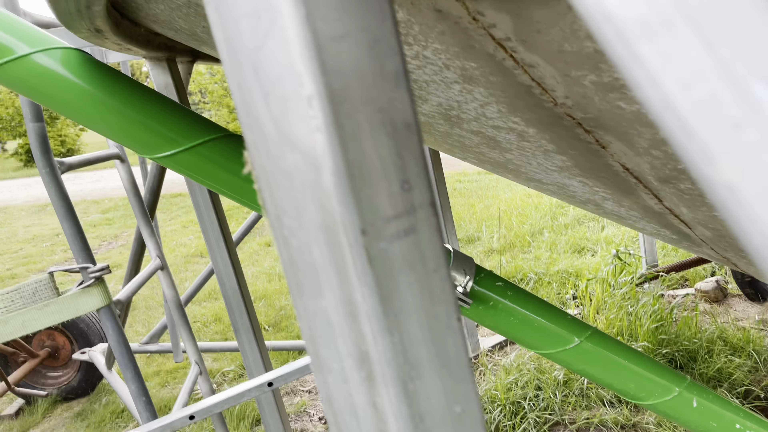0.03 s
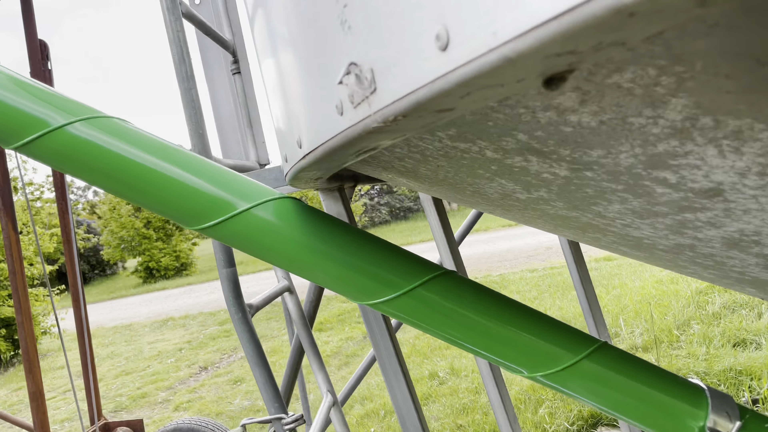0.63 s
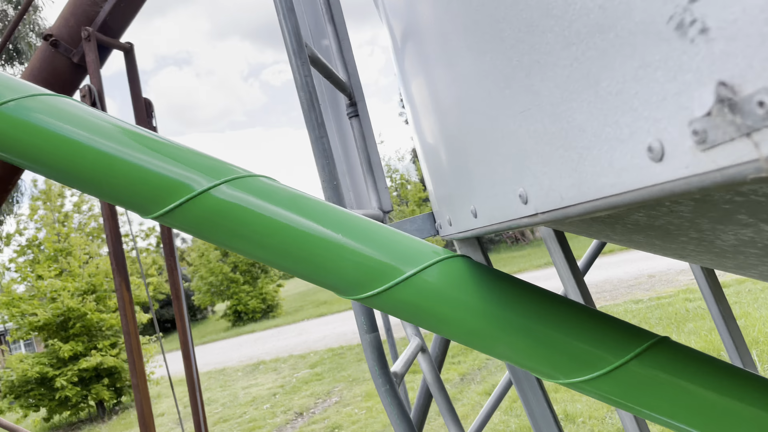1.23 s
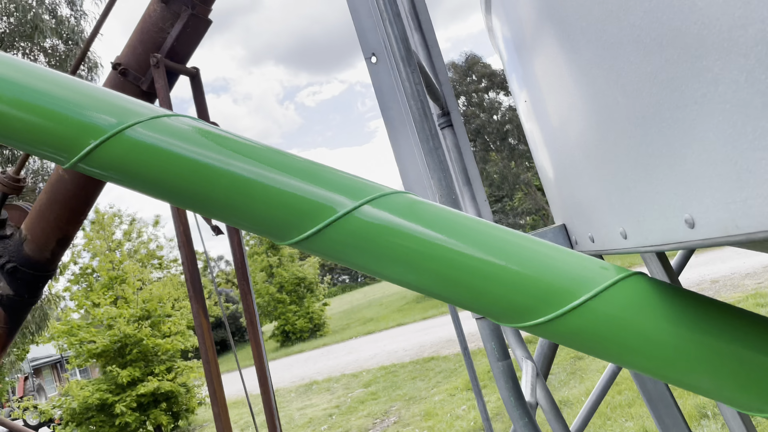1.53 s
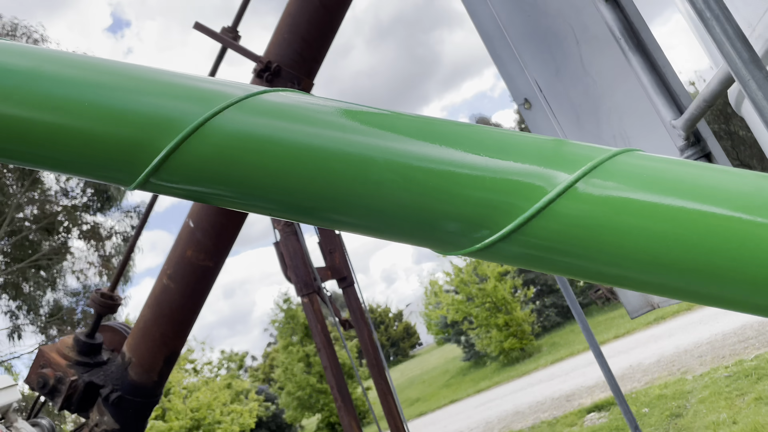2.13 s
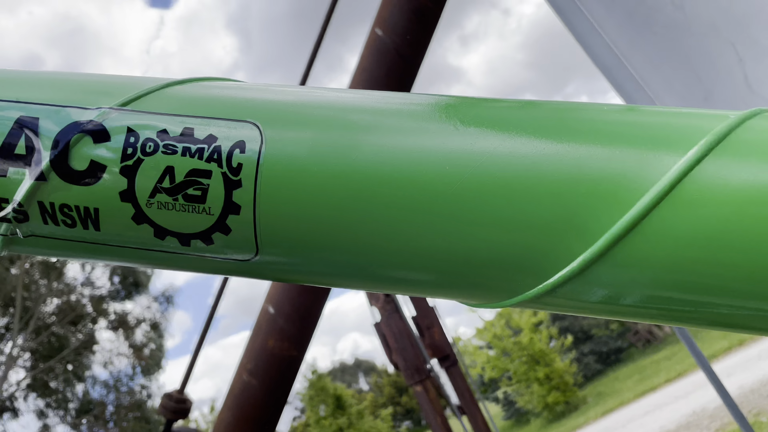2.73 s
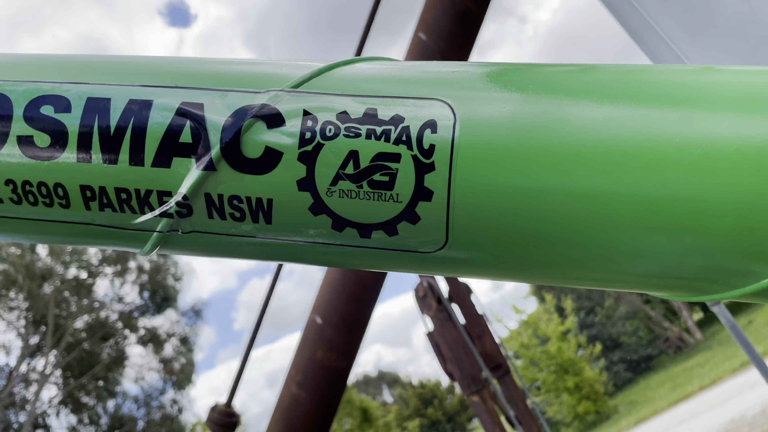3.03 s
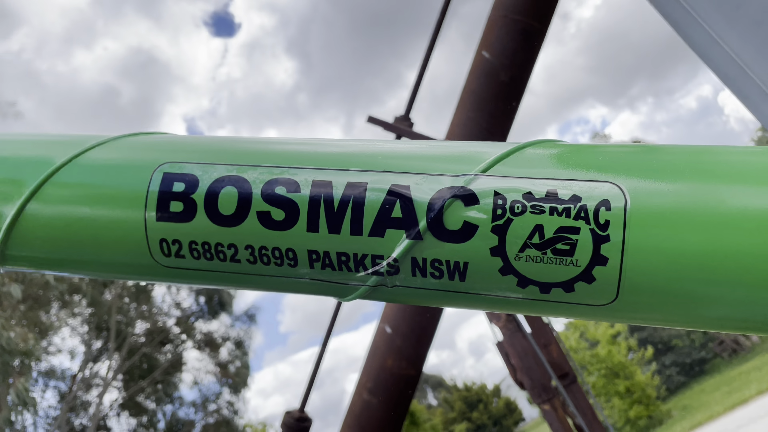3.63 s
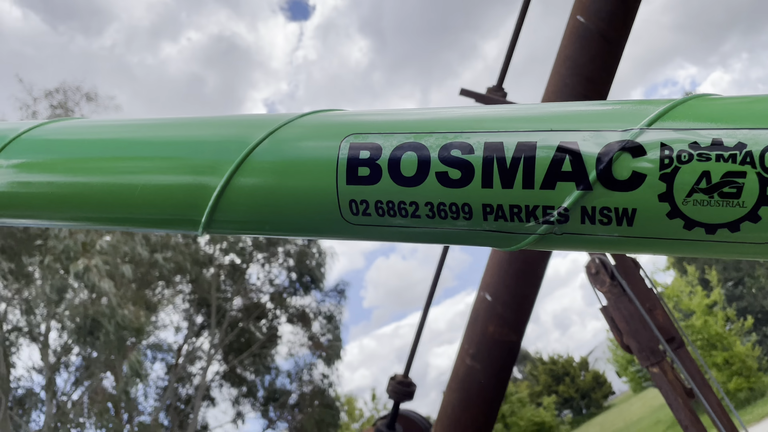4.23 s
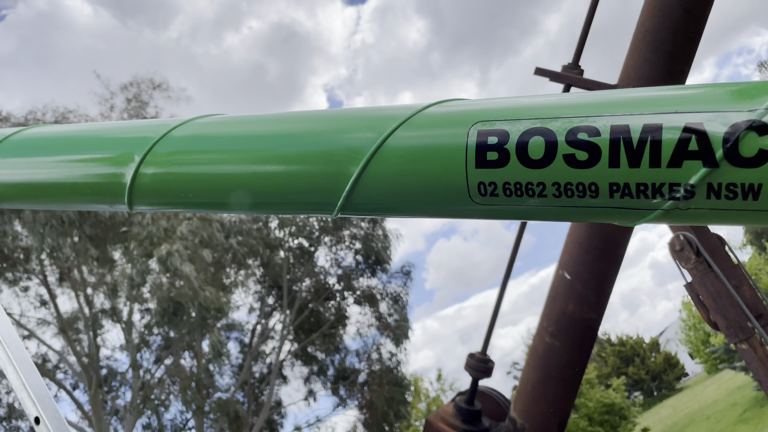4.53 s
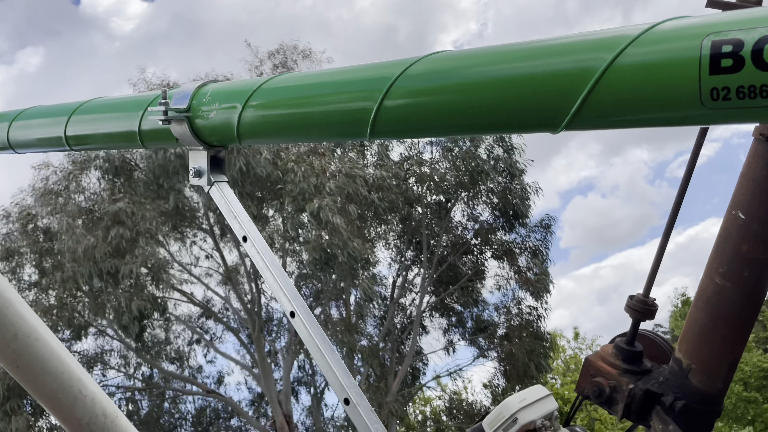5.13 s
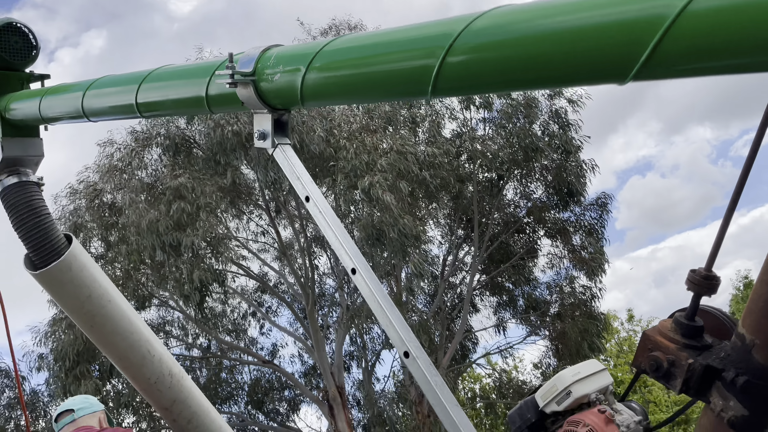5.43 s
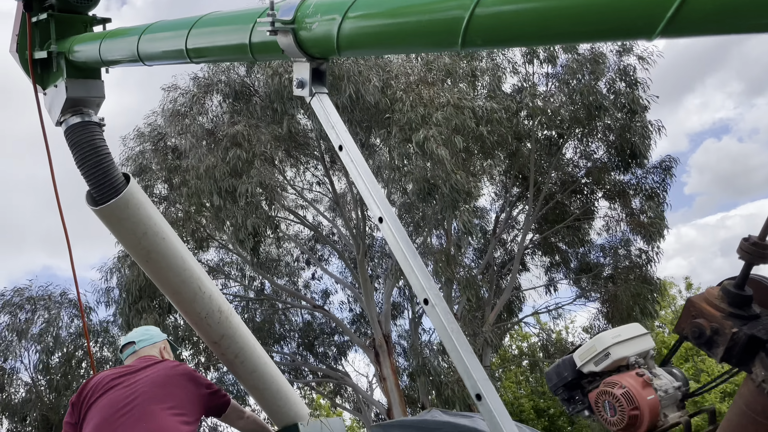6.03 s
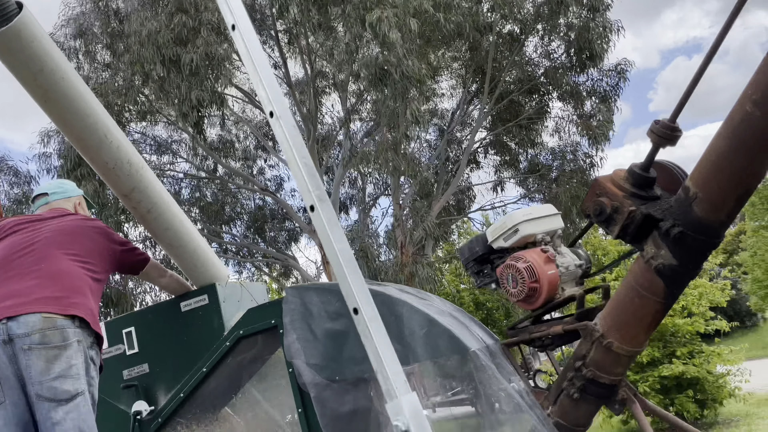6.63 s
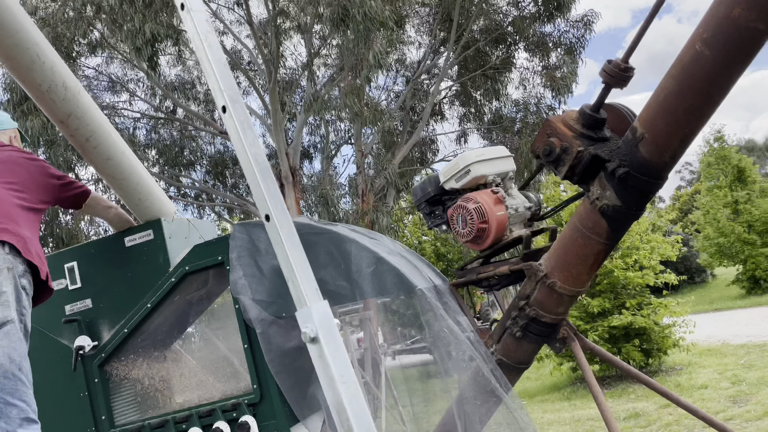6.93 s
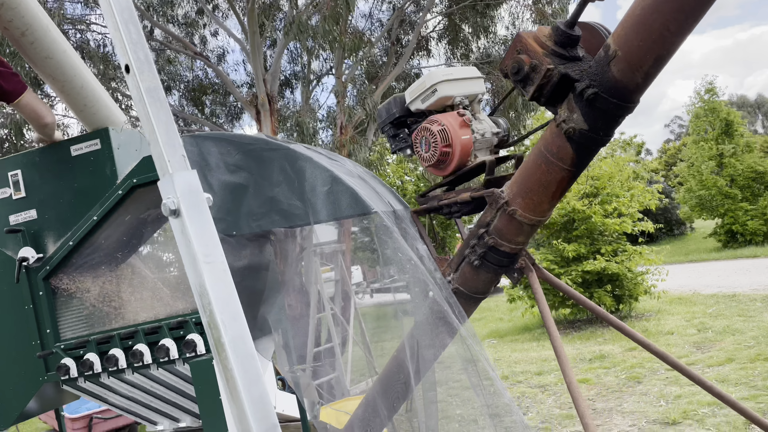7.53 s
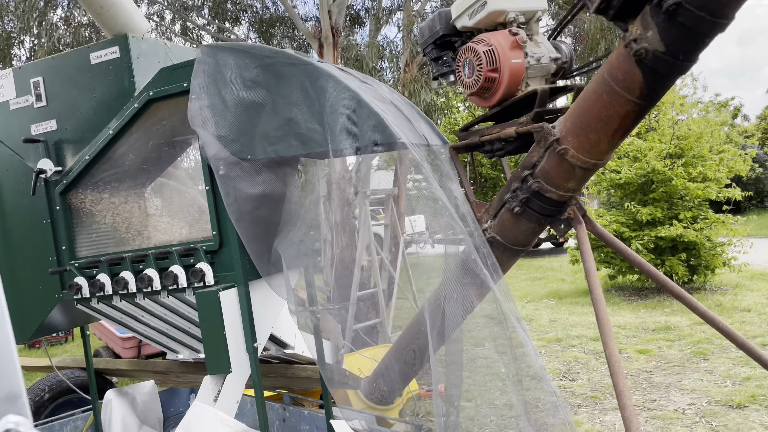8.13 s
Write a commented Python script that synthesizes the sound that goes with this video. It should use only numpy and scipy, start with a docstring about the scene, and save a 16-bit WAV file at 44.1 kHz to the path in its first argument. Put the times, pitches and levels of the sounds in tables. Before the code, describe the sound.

A grain auger grinds, rumbles and knocks in its steel tube over a droning petrol engine and a constant hiss of grain.

```python
"""A grain auger's screw grinds, scrapes, knocks and rumbles in its steel tube, outdoors by a seed cleaner.
A petrol engine drones and turns the screw through a belt. Grain hisses over pipe and screens.
Shaken sheet metal hums, each part swelling and fading as a two-port microphone is carried
past the hopper, along the tube and up to the cleaner."""
import sys
import numpy as np
from scipy import signal
from scipy.fft import rfft, irfft, next_fast_len
from scipy.io import wavfile
from scipy.ndimage import map_coordinates

SR = 44100
rng = np.random.default_rng(int(sys.argv[2]) if len(sys.argv) > 2 else 0)


def to_wav(s):
    """Save 16-bit WAV."""
    ch = np.atleast_2d(s).T  # columns
    pcm = np.round(np.clip(ch, -1, 1) * 32767)  # PCM
    wavfile.write(sys.argv[1], SR, pcm.astype(np.int16))


N = 365588
T = np.arange(N) / SR

# Steel tube resonances. Each row: centre in Hz, width in Hz, relative level in dB.
TUBE_MODES = [(349, 88, -1), (437, 52, -0.5), (502, 88, -3), (590, 116, -5.5), (750, 42, -5),
              (831, 67, -6.5), (978, 200, -6), (1140, 96, -7), (1239, 62, -7.5), (1352, 74, -4.5),
              (1500, 104, -5), (1665, 250, -9), (1880, 190, -10), (2230, 490, -13.5)]
# Phase between the microphone ports. Each row: frequency in Hz, lead of the left port in radians.
PORT_PHASE = [(100, -0.04), (500, 0.45), (1000, 0.88), (1600, 0.98), (2700, -0.66), (5200, -0.74),
              (5750, 1.7), (6600, 0.92), (7800, 2.99), (9000, 3.18), (11000, 4.63), (13000, 6.26)]


def auger(turns):
    """The screw's flight grinds grain along the wall without pause and at times scrapes the steel."""
    # The tube emerges from behind the hopper and moves right. Each row: time in seconds,
    # then grinding level, brightness, top lift and left over right, all in dB.
    tube_path = [(0, -33, -6, -2.5, 11.5), (1.2, -25.5, -6.5, -10, 2), (2.1, -27.5, 1.5, -3, -1),
                 (2.9, -24.5, -0.5, -6.5, -1.5), (4.4, -26.5, 1.5, -1, -3.5), (6.1, -27, -1.5, -2.5, -5),
                 (7, -25.5, -0.5, -1, -3), (7.6, -26, 1, -3, -3.5), (8.29, -25, 0.5, -1.5, -2.5)]
    grind_db, bright_db, top_db, side_db = curves(tube_path)
    contacts = shifting(impacts(per_second=7000), depth_db=1.2, size=1024)
    pressure_db = 0.12 * np.sin(2 * np.pi * turns) + 0.4 * wobble(16) + 0.6 * wobble(55)
    rattle_db = 1.25 * wobble(18)  # loose kernels rattle the upper modes
    grinding = amp(pressure_db) * tube_ring(contacts, bright_db + rattle_db / 2, top_db + rattle_db)
    return amp(grind_db + np.array([side_db, -side_db]) / 2) * (grinding + scrapes(bright_db, top_db))


def scrapes(bright_db, top_db):
    """Flight on steel: short swells of hard, closely spaced contacts."""
    # Each row: centre in seconds, level over the grinding in dB, Gaussian sigma in seconds,
    # added brightness in dB, added top lift in dB.
    swells = [(0.12, 0, .015, 0, 2), (0.574, 5, 0.026, -3, 3), (0.645, 1, 0.026, -2, 3),
              (1.29, -7, 0.028, 0, 7), (1.88, -2, 0.036, 11, -3), (2.002, 1, 0.035, 0, -6),
              (2.136, -3, .018, 6, 7), (2.612, 2.5, 0.021, 0, 0), (2.904, 1, 0.03, 3, 5),
              (3.092, 2, 0.015, -3, 2), (3.16, -4, .014, 6, 4), (3.39, -2, 0.024, 4, 5),
              (3.862, 4, 0.0099, -5, -4), (3.916, -2, .02, 2, 1), (4.183, 3, 0.021, 1, -2),
              (4.395, 2, .012, -5, -4), (4.59, -3, 0.02, 3, 5), (4.66, 2.5, 0.019, -3, -9),
              (4.86, -3, 0.017, 7, 6), (4.926, 1, 0.026, -2, 4.5), (5.119, 4, 0.012, -1, 5),
              (5.415, 0, 0.014, -3, 6), (5.537, -7, 0.011, 0, 8), (5.823, -1, .012, -7, -2),
              (6.02, 2, 0.013, -2, -2), (6.47, -5, .018, 3, -1), (6.604, -12, .025, 2, 14),
              (6.92, -2.5, 0.032, 1, 4), (7.072, -5, 0.013, -10, 1), (7.17, -3, 0.015, 5, 4),
              (7.7, -3, 0.02, 4, 2), (7.927, 1, 0.023, -3, 2), (8.19, -2, 0.02, 1, 4)]
    power, lift_db = np.zeros(N), np.zeros((2, N))
    for at_s, db, sigma_s, *colour_db in swells:
        bump = bell(at_s, sigma_s) * (np.abs(T - at_s) < 4 * sigma_s)
        power += (amp(db) * bump) ** 2
        lift_db += np.outer(colour_db, np.sqrt(bump))
    ring = tube_ring(impacts(per_second=5000), bright_db + lift_db[0], top_db + lift_db[1], wall_db=-4.5)
    return np.sqrt(power) * ring


def tube_ring(blows, bright_db, top_db, wall_db=-7):
    """Blows ring the tube's modes over its dense wall sound; bright_db lifts the mids, top_db the highs."""
    # Wall spectrum. Each row: frequency in Hz, relative density in dB.
    wall_spectrum = [(120, -42), (300, 0.5), (450, -0.5), (1000, 0.5), (1500, -5), (2200, -9.5),
                     (3200, -15.5), (7000, -42)]

    def colour(hz):
        mode_power = sum(amp(db) ** 2 * np.abs(resonance(hz, centre_hz, width_hz)) ** 4
                         for centre_hz, width_hz, db in TUBE_MODES)
        return np.sqrt(mode_power + amp(wall_db + along(wall_spectrum, hz)) ** 2)
    ring = at_ports(blows, colour)
    dull = treble_cut(ring, corner_hz=1200, exponent=8)
    hollow = treble_cut(ring, corner_hz=1620, exponent=24)
    return dull + amp(bright_db) * (hollow - dull) + amp(top_db) * (ring - hollow)


def knocks():
    """The flight strikes the tube, ringing one note and the modes near it; each hit lands on a new spot."""
    # Each row: start in seconds, note in Hz, note level in dB, joint mode level in dB, t60 in seconds.
    hits = [(.105, 1450, -26, -29, .12), (2.213, 647, -21.5, -17, 0.14), (2.296, 637, -20, -21, 0.11),
            (2.589, 1030, -21, -16, 0.11), (2.893, 1480, -20, -19, .14), (3.061, 816, -18, -18, 0.11),
            (3.361, 1400, -27, -17.5, 0.11), (3.39, 900, -23, -21, 0.15), (3.841, 1384, -27, -21, 0.09),
            (4.33, 1990, -20, -15, 0.088), (5.106, 1190, -26, -16, 0.1), (5.395, 783, -19, -21, 0.15),
            (5.666, 1405, -24, -20, 0.074), (5.72, 905, -22, -21, .08), (6.202, 977, -17, -17.5, 0.091),
            (6.46, 1450, -21.5, -31, .13), (6.648, 750, -20, -30, .11), (6.842, 740, -20, -22, .1),
            (7.137, 1490, -22, -19, 0.084), (7.162, 984, -22, -23, .1), (7.62, 900, -21, -20, 0.12),
            (7.898, 1280, -26, -19, 0.12), (8.093, 776, -14, -21, .1), (8.166, 564, -19, -20, 0.089)]
    spread_octaves, rise_s = 0.9, 0.002
    drift_rad_per_sqrt_s = 8  # grain against the wall roughens the ring
    out, t = np.zeros((2, N + SR)), np.arange(SR // 4) / SR
    mode_hz, _, mode_db = np.transpose(TUBE_MODES)
    chance = rng.standard_normal((len(hits), 2, len(mode_hz)))
    for (start_s, note_hz, note_db, joint_db, t60_s), (detune, phase) in zip(hits, chance):
        share = amp(mode_db / 2) * np.exp(-.5 * (np.log2(mode_hz / note_hz) / spread_octaves) ** 2)
        gains = np.append(amp(joint_db) * share / np.linalg.norm(share), amp(note_db))
        hz = np.append(mode_hz * (1 + .015 * detune), note_hz)
        start_rad = np.append(np.pi * phase, 0) + along(PORT_PHASE, hz) * np.array([[.5], [-.5]])
        steps = rng.standard_normal((len(hz), len(t)))
        drift_rad = drift_rad_per_sqrt_s * np.cumsum(steps, axis=1) / np.sqrt(SR)
        ring = gains @ np.sin(2 * np.pi * hz[:, None] * t + start_rad[..., None] + drift_rad)
        envelope = amp(-60 * t / t60_s) * (1 - np.exp(-t / rise_s))
        out[:, round(start_s * SR):][:, :len(t)] += ring * envelope
    return out[:, :N]


def rumble(turns):
    """The screw thumps in its tube, hardest twice a turn, and the frame shudders."""
    # Each row: frequency in Hz, relative density in dB.
    rumble_spectrum = [(15, -26), (25, -21), (45, -10), (70, -2.5), (95, -1.5), (130, 0.7), (170, -2.5),
                       (200, -2), (235, -3.5), (290, -4.5), (390, -11.5), (700, -18.5), (2000, -49)]
    start_db, fade_db_per_s = -24.5, 0.46
    beat = amp(.8 * np.sin(2 * np.pi * turns) + 1.3 * np.sin(4 * np.pi * turns))
    body = at_ports(beat * impacts(per_second=8000), lambda hz: amp(along(rumble_spectrum, hz)))
    return amp(start_db - fade_db_per_s * T) * body


def low_swells():
    """The low rumble swells briefly at irregular moments, mostly around 150-185 Hz."""
    # Each row: centre in seconds, pitch in Hz, peak in dB.
    swells = [(.08, 157, -25), (.17, 161, -27), (.26, 148.8, -23), (.33, 165, -24.5), (.45, 167, -23),
              (.8, 165, -24), (1.32, 159, -26), (1.4, 164, -22), (1.59, 165, -20), (1.88, 177, -24.5),
              (2.3, 179.7, -26), (2.6, 125, -21.5), (2.71, 176, -24.5), (2.95, 173, -27), (3.36, 178, -27),
              (3.66, 163.4, -23.5), (4.53, 175, -22), (4.63, 175, -25), (4.73, 172, -27), (4.8, 182, -28),
              (5.15, 176.4, -22), (5.32, 163, -30), (5.76, 169.4, -24.5), (5.91, 177, -20.5),
              (6.96, 169.7, -22), (7.05, 157, -26), (7.15, 161, -26), (7.44, 167, -25), (7.54, 168, -25),
              (7.66, 173.7, -25), (7.88, 186, -26), (8.01, 161, -30), (8.12, 167, -27)]
    return sum(amp(db) * bell(at_s, sigma_s=.021) * np.sin(2 * np.pi * (hz * T + phase))
               for (at_s, hz, db), phase in zip(swells, rng.random(len(swells))))


def engine(firings):
    """Exhaust drone: low orders of the firing rate, each a little unsteady."""
    # Each row: multiple of the firing rate, relative level in dB.
    exhaust_orders = [(2, -0.5), (3, 1.5), (4, -4.5), (5, -13), (6, -15.5)]
    start_db, fade_db_per_s = -25.5, 0.04
    drone = sum(amp(db + 0.54 * wobble(5.3)) * np.sin(2 * np.pi * (order * firings + rng.random()))
                for order, db in exhaust_orders)
    return amp(start_db - fade_db_per_s * T) * unit(drone)


def grain():
    """Countless kernels on pipe and screens merge into a hiss; its top fizz is beamed and easily shaded."""
    # Each row: time in seconds, hiss level in dB, fizz over hiss in dB.
    stream_levels = [(0, -26.5, -4.5), (.5, -26.5, -1.5), (1.5, -25.5, -2.3), (2.5, -24, -1.3),
                     (4.3, -25, -1.5), (5.3, -26, -0.5), (6.4, -26.5, -1.1), (7.1, -26, -1),
                     (7.9, -24.5, -5), (8.29, -24.5, -3)]
    # Each row: frequency in Hz, relative density in dB before the bass cut.
    hiss_spectrum = [(1200, -3), (2700, 0), (3500, -0.5), (4300, -0.1), (5000, 0), (5300, -0.5), (5550, -3),
                     (5900, 0), (6600, 0.5), (7000, 0.4), (8000, 1.7), (9700, -0.5), (10200, 6), (12200, 0),
                     (13100, 4), (14000, 0.5), (15200, -7)]
    # Each row: frequency in Hz, left over right in dB.
    hiss_balance = [(1500, 0), (3200, 4), (5000, 2.5), (6500, 1), (8000, 0)]
    hiss_db, fizz_db = curves(stream_levels)
    kernels = rng.standard_normal((2, N)) + amp(-4.5) * impacts(per_second=6000)
    kernels = shifting(kernels, depth_db=1.5, size=512)
    hiss = at_ports(kernels, lambda hz: amp(along(hiss_spectrum, hz)) * hz ** 2 / (hz ** 2 + 700 ** 2))
    hiss = filtered(hiss, lambda hz: amp(along(hiss_balance, hz) * np.array([[.5], [-.5]])))
    patter = treble_cut(hiss, corner_hz=7300, exponent=12)
    fizz = hiss - patter
    surge_db = lambda: (wobble(5) + wobble(40)) / 7  # uneven flow, drawn anew for each band
    return amp(hiss_db) * (amp(surge_db()) * patter + amp(fizz_db + surge_db()) * fizz)


def panels():
    """Sheet metal along the walk: hopper, frame, auger barrel, cleaner casing, chute."""
    # Resonances of each part. Each row: centre in Hz, width in Hz, level when nearest in dB.
    hopper_modes = [(135, 43, -39), (156, 13, -35.5), (244, 24, -36.5), (288, 12, -32.5), (489, 36, -40),
                    (604, 82, -42), (830, 31, -41.5), (1007, 170, -37.5), (1464, 51, -44.5),
                    (2070, 350, -38.5), (4950, 600, -41.5)]
    frame_modes = [(109, 27, -35), (233, 21, -40), (535, 60, -37), (635, 65, -35.5), (833, 60, -32.5),
                   (1020, 160, -42), (2300, 300, -51)]
    barrel_modes = [(112, 24, -36), (348, 35, -44), (436, 80, -41), (823, 100, -41.5), (1020, 110, -46),
                    (1520, 230, -42)]
    cleaner_modes = [(157, 24, -38), (190, 22, -35), (288.6, 23, -38.5), (432, 28, -39.5), (742, 26, -42),
                     (950, 69, -45), (1210, 55, -43), (2100, 180, -43.5)]
    chute_modes = [(158, 39, -31), (326, 34, -42), (495, 52, -35), (590, 55, -32.5), (730, 50, -52)]
    return (panel(hopper_modes, nearest_s=1, reach_s=0.86)
            + panel(frame_modes, nearest_s=2.01, reach_s=0.34)
            + panel(barrel_modes, nearest_s=2.93, reach_s=0.55)
            + panel(cleaner_modes, nearest_s=5.9, reach_s=2.3)
            + panel(chute_modes, nearest_s=8.63, reach_s=0.81))


def panel(modes, nearest_s, reach_s):
    """Shaken sheet metal hums at its resonances, loudest when nearest."""
    def colour(hz):
        return np.sqrt(sum(amp(db) ** 2 / width_hz * np.abs(resonance(hz, centre_hz, width_hz)) ** 4
                           for centre_hz, width_hz, db in modes))
    level = np.sqrt(sum(amp(db) ** 2 for _, _, db in modes))
    return level * bell(nearest_s, reach_s) * at_ports(rng.standard_normal((2, N)), colour)


def at_ports(pair, colour):
    """Two unrelated signals, coloured and blended into the left and right ports, rms 1."""
    # Each row: frequency in Hz, likeness of the ports from 0 to 1.
    port_coherence = [(60, .98), (250, .93), (500, .8), (1000, .45), (2500, .52), (4500, .56), (5500, .2),
                      (7000, .45), (8200, .98), (9000, .98), (10000, .78), (11000, .7), (13000, .99)]

    def blend(hz):
        angle_rad = np.arccos(np.clip(along(port_coherence, hz), 0, .995)) / 2
        return colour(hz) * np.array([np.cos(angle_rad), np.sin(angle_rad)])
    shared, apart = filtered(pair, blend)
    lead = lambda hz: np.exp(.5j * along(PORT_PHASE, hz) * np.array([[1], [-1]]))
    return unit(filtered(np.array([shared + apart, shared - apart]), lead))


def impacts(per_second):
    """Two unrelated showers of tiny blows, rms 1."""
    return unit(rng.standard_normal((2, N)) * (rng.random((2, N)) < per_second / SR))


def shifting(x, depth_db, size):
    """Patches of the spectrum swell and fade at random; frames of size samples, rms 1."""
    frames = signal.stft(x, nperseg=size)[2]
    patch = np.outer(np.hanning(7), np.hanning(9))
    field = signal.fftconvolve(rng.standard_normal(frames.shape[1:]), patch, "same")
    return unit(signal.istft(frames * amp(depth_db * unit(field)), nperseg=size)[1][:, :N])


def resonance(hz, centre_hz, width_hz):
    """Response of one damped mode."""
    return 1j * hz * width_hz / (centre_hz ** 2 - hz ** 2 + 1j * hz * width_hz)


def filtered(x, response):
    """Apply a complex response, given as a function of Hz."""
    size = next_fast_len(N + SR // 4)
    return irfft(rfft(x, size) * response(np.fft.rfftfreq(size, 1 / SR)), size)[..., :N]


def treble_cut(x, corner_hz, exponent):
    """Zero-phase low-pass, 6 dB down at the corner."""
    return filtered(x, lambda hz: 1 / (1 + (hz / corner_hz) ** exponent))


def wobble(knots_per_s):
    """Smooth random curve."""
    return map_coordinates(rng.standard_normal(int(N * knots_per_s / SR) + 4), [T * knots_per_s])


def bell(centre_s, sigma_s):
    """Gaussian swell, peak 1."""
    return np.exp(-.5 * ((T - centre_s) / sigma_s) ** 2)


def curves(rows):
    """One value per sample for each column after the time."""
    times_s, *columns = np.transpose(rows)
    return [np.interp(T, times_s, column) for column in columns]


def along(points, hz):
    """(Hz, value) points read on a log axis."""
    knots_hz, values = np.transpose(points)
    return np.interp(np.log(hz + 1), np.log(knots_hz + 1), values)


def amp(db):
    """Decibels to gain."""
    return 10 ** (np.asarray(db) / 20)


def unit(x):
    """Scale to rms 1."""
    return x / np.sqrt(np.mean(x ** 2) + 1e-20)


def scene():
    """The engine paces the screw through the belt; all parts sound together."""
    # Each row: time in seconds, firings per second.
    engine_speed = [(0, 25.56), (2.5, 25.54), (5.5, 25.46), (8.29, 25.57)]
    turns_per_firing = 2 / 5
    firings = np.cumsum(curves(engine_speed)[0]) / SR
    turns = turns_per_firing * firings
    return engine(firings) + rumble(turns) + low_swells() + panels() + auger(turns) + knocks() + grain()


def record(dry):
    """Brick-wall band limit."""
    top_hz = 15750
    return filtered(dry, lambda hz: hz < top_hz)


dry = scene()
out = record(dry)
to_wav(out)
```